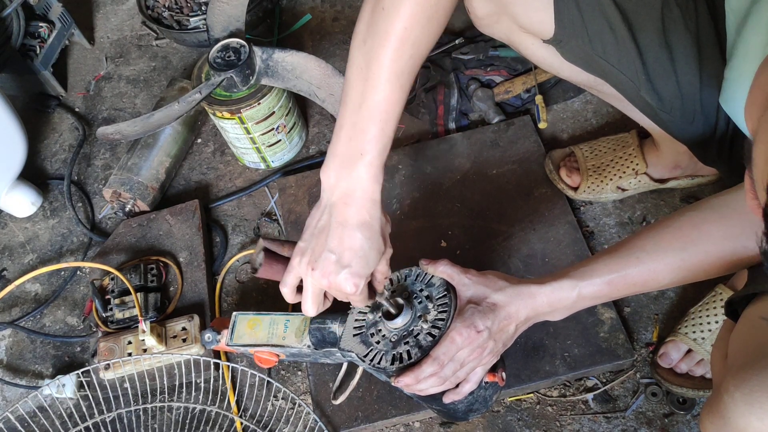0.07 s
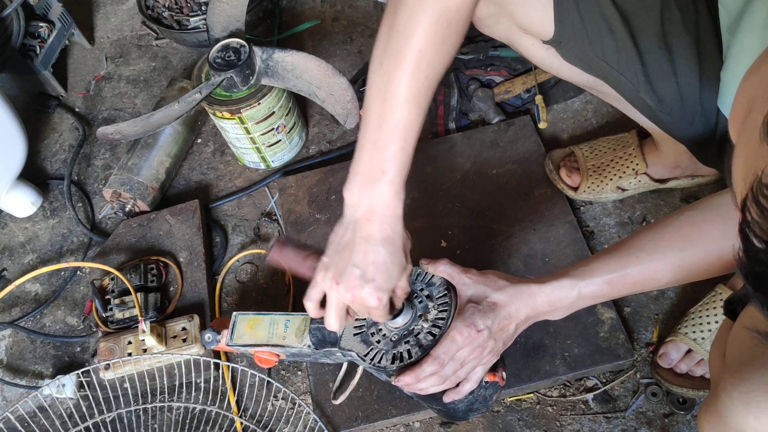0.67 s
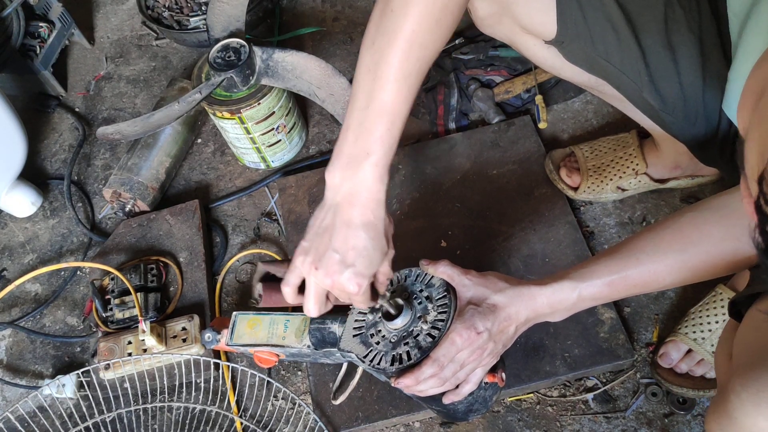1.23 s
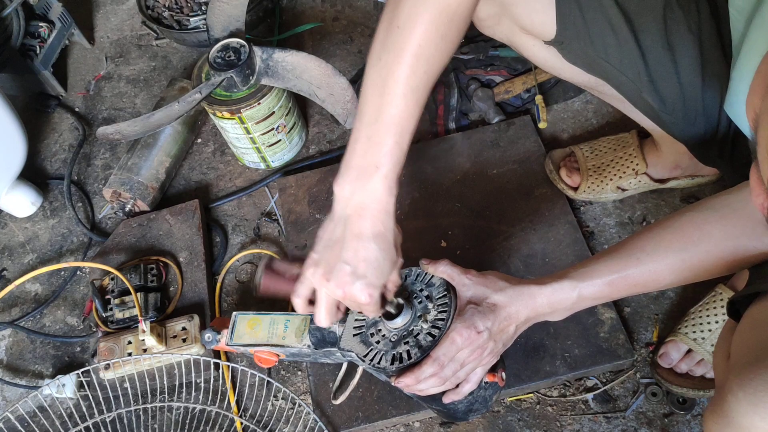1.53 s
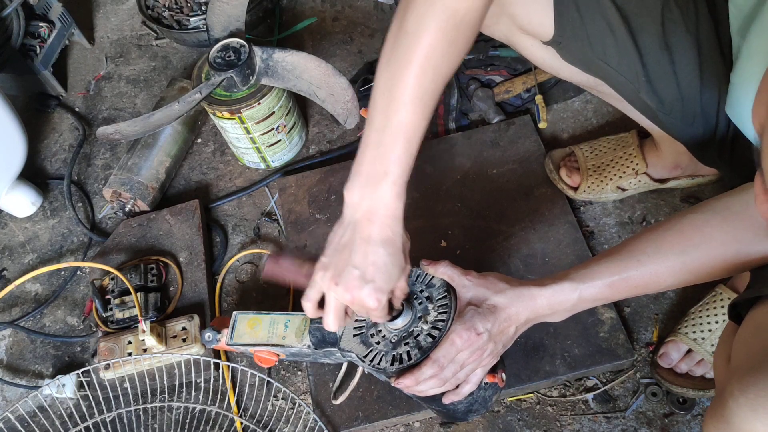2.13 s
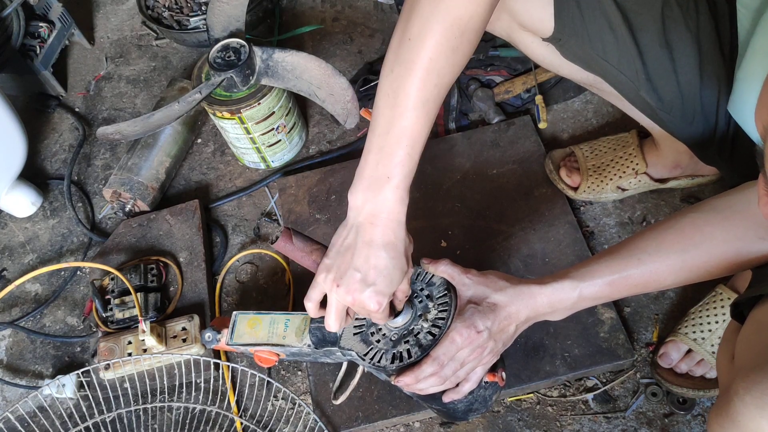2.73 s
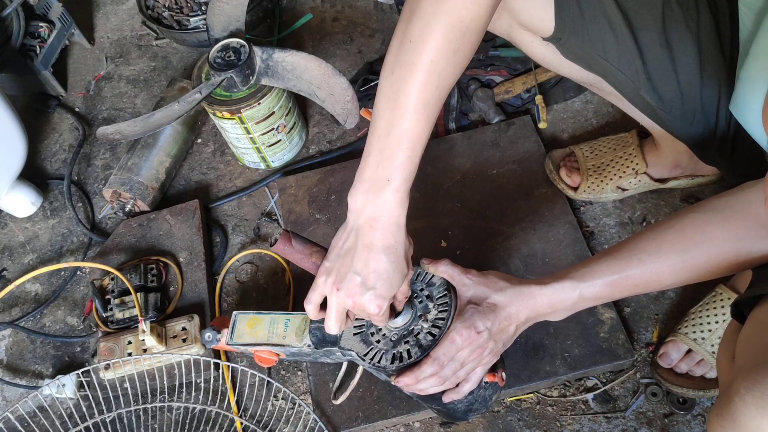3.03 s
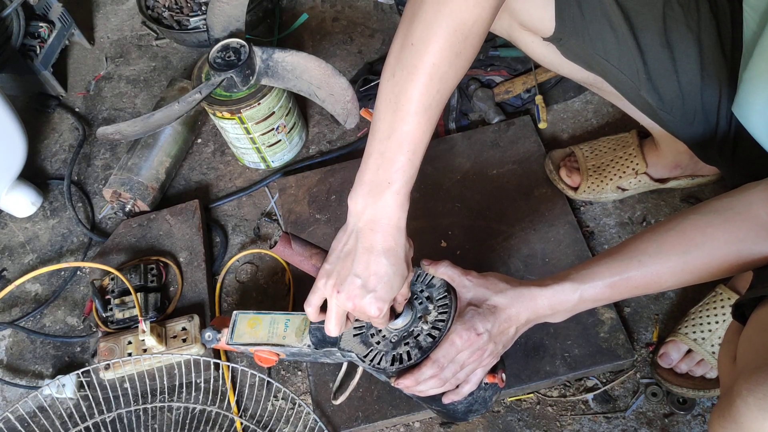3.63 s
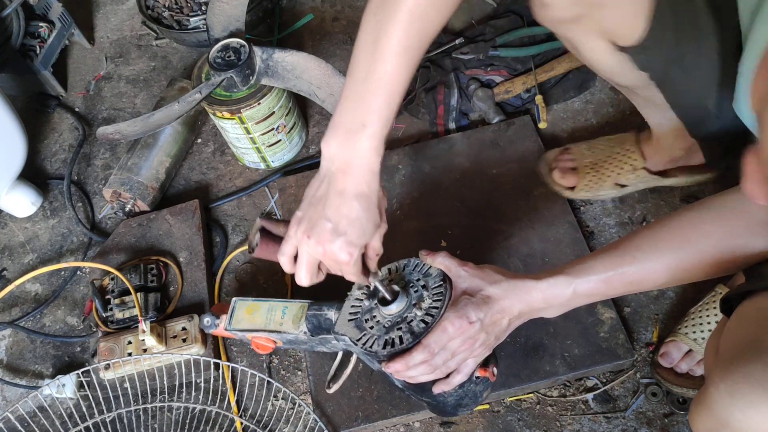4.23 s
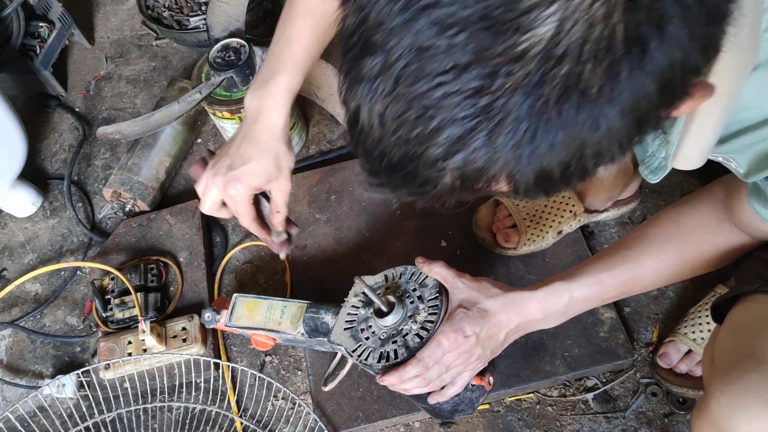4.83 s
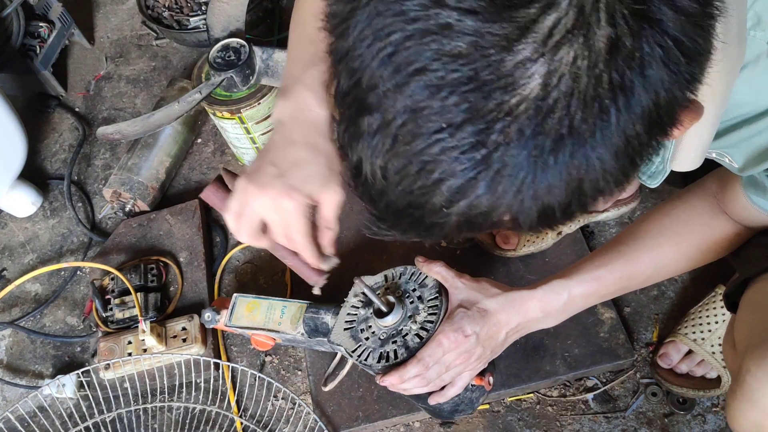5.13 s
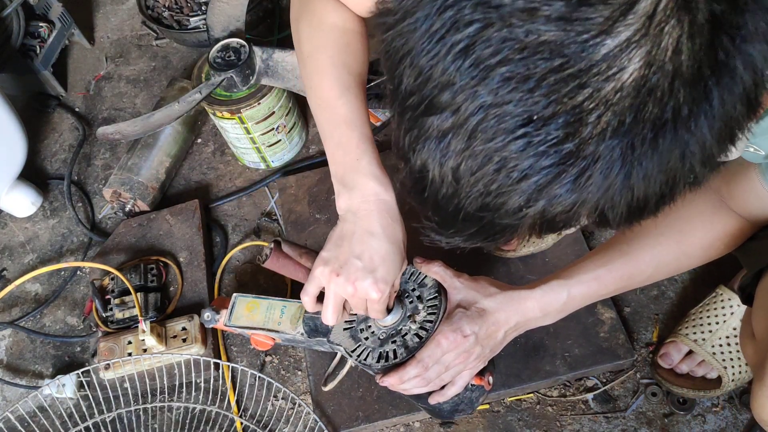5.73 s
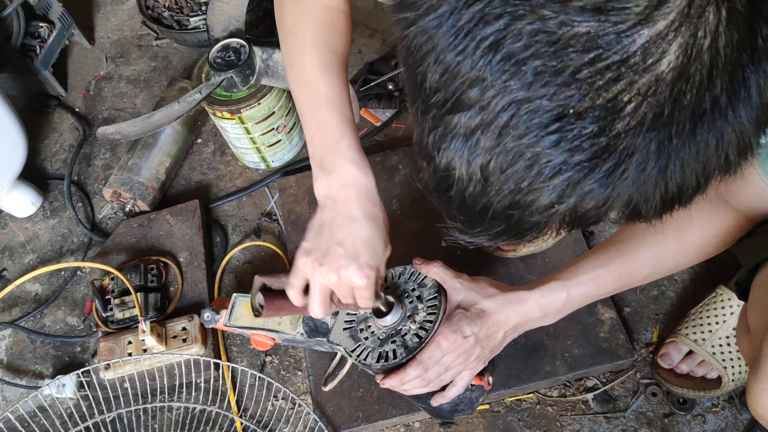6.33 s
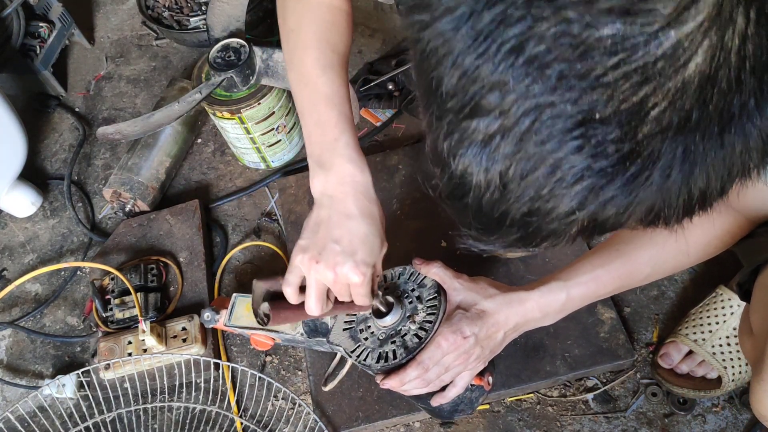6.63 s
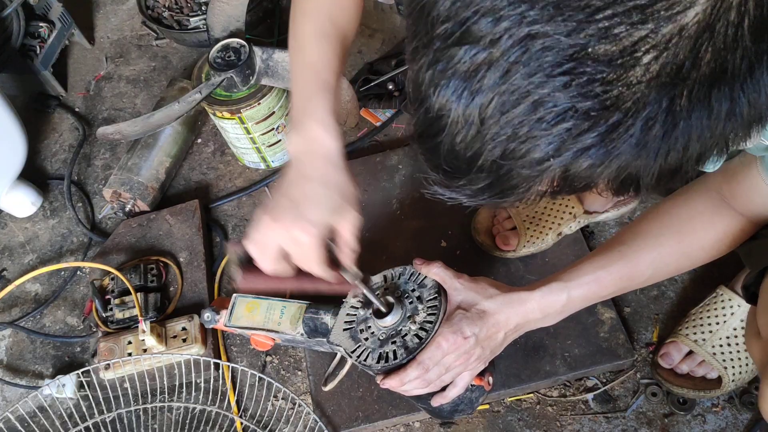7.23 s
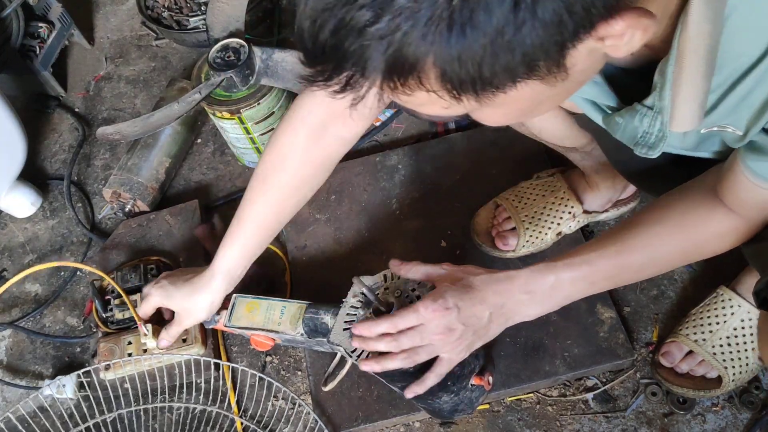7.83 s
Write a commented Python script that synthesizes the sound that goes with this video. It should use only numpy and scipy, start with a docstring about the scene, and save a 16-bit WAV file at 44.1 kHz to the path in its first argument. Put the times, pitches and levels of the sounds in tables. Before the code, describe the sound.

Close up in a repair workshop, dry, bright scratching pulses as sandpaper rubs around a steel motor shaft, the motor body ringing faintly. After a short pause with scuffs and paper snaps, a second, shorter bout starts with a thin, high squeal. The stiff paper crackles as it comes off and is set down. A fan's airy hum runs underneath, with occasional low puffs of air on the microphones.

```python
"""A gritty, hissing scratch pulses as sandpaper is twisted back and forth round a motor's steel shaft.
Stick-slip friction makes dense tiny clicks that set the gripped paper and the motor body ringing. There
are two bouts, the second with a thin squeal; the paper crackles as it is pulled off and put down, and a
faint high whine enters after the first bout. Behind the work a fan hums in the workshop, and its draught
buffets a close pair of microphones with ringing ports."""
import sys
import numpy as np
from scipy import signal
from scipy.fft import rfft, irfft, next_fast_len
from scipy.io import wavfile
from scipy.ndimage import uniform_filter1d

SR = 44100
rng = np.random.default_rng(int(sys.argv[2]) if len(sys.argv) > 2 else 0)


def wrap_up_sound(samples):
    """Save the sound to the file named by the first command line argument, as 16-bit audio."""
    columns = np.atleast_2d(samples).T
    # keep every value between -1 and 1, then stretch to whole-number steps
    tamed = np.clip(columns, -1, 1)
    steps = np.round(tamed * 32767).astype(np.int16)
    wavfile.write(sys.argv[1], SR, steps)


N = 347949
TIME = np.arange(N) / SR

# Levels in the tables are relative: each source applies its own gain.
# spectrum of the fan's rushing air: frequency_hz, gain_db
FAN_AIR_SPECTRUM = [(30, 7.5), (100, 6), (160, -6.5), (350, 0.5), (700, -1), (2000, -12.5), (3500, -11),
                    (4600, -10.5), (6000, -13), (7300, -15.5), (9000, -12.5), (11000, -26), (16000, -24)]
# tones of the fan: pitch_hz, level_db
FAN_TONES = [(103, -59.5), (210, -64.5), (371, -65)]
# spectrum of eddies at the microphones: frequency_hz, gain_db
EDDY_SPECTRUM = [(30, 1.5), (70, -1), (120, -11), (180, -18), (300, -33.5), (800, -67)]
# puffs of draught: centre_s, level_db, half_length_s
DRAUGHT_PUFFS = [(0.152, -57, 0.064), (0.861, -49.5, 0.016), (1.285, -51.5, 0.03), (2.294, -45.5, 0.032),
                 (3.637, -43.5, 0.04), (3.83, -47, 0.03), (6.408, -44, 0.031), (6.955, -43.5, .012),
                 (7.021, -38, 0.0093), (7.104, -44, 0.025), (7.44, -47.5, 0.019), (7.521, -40, 0.013)]
# breeze between the puffs: time_s, level_db
BREEZE_LEVEL = [(1.4, -45), (1.6, -65), (2.15, -72.5), (2.6, -43), (4.9, -51.5), (7.5, -42.5)]
# course of the high whine: time_s, pitch_hz
WHINE_PITCH = [(4.6, 14200), (5.3, 14400), (7.4, 15100), (7.89, 14700)]
# scuffs, knocks and a faint ring of hand and paper: start_s, level_db, pitch_hz, width_hz, decay_s
SOFT_CONTACTS = [(4.188, -42.5, 480, 230, 0.19), (4.393, -35.5, 557, 710, 0.053),
                 (4.477, -33, 590, 150, 0.0053), (4.48, -51.5, 888, 6.2, 0.12),
                 (5.402, -38, 630, 220, 0.07), (7.245, -33, 5060, 590, 0.064),
                 (7.276, -29, 1640, 1300, 0.019), (7.535, -40, 1620, 800, 0.027)]
# paper snapping on the shaft's end, in the hand and on the floor: start_s, level_db, decay_s
PAPER_SNAPS = [(3.901, -22, .003), (4.796, -28, .001), (4.801, -24, 0.00093), (4.805, -19.5, 0.00088),
               (4.812, -32, 0.0009), (5.29, -38.5, 0.02), (5.367, -34, .02), (5.415, -19, 0.0017),
               (5.462, -21, 0.022), (7.262, -29, 0.0072), (7.272, -16, 0.0056), (7.303, -22, 0.003),
               (7.563, -32.5, 0.064), (7.58, -28, 0.008)]
# squeal as the paper bears on the shaft again: time_s, pitch_hz, level_db
SQUEAL_COURSE = [(5.42, 9500, -70), (5.52, 9500, -33), (5.8, 9500, -44), (5.98, 8640, -43),
                 (6.15, 8300, -51), (6.3, 8400, -34), (6.5, 8400, -64.5)]
# spells with the paper on the shaft: start_s, end_s
CONTACT_BOUTS = [(0, 4.54), (5.36, 7.33)]
# resonances of the motor body: pitch_hz, width_hz, gain_db
MOTOR_MODES = [(570, 120, -43), (668, 83, 8.5), (853, 250, -0.5), (1097, 260, 3.5), (1330, 170, -8),
               (2013, 440, 2.5), (2610, 290, 1)]
# spectrum of grit scratching steel: frequency_hz, gain_db
GRIT_SPECTRUM = [(100, -14), (300, -18.5), (550, -10.5), (1200, -6), (2000, -2), (3000, 0.5), (5000, -1),
                 (16000, -6.5)]
# centre of the paper's hiss, shifting with the hold: time_s, pitch_hz
HISS_CENTRE = [(0.0, 9220), (0.98, 9060), (3.39, 9130), (4.55, 8820), (5.61, 9000), (6.06, 8900),
               (7.3, 8820)]
# strokes, each a loose slide back and then a gripped twist:
# twist_start_s, slide_length_s, twist_length_s, grip_lead_s, slide_swell_db, twist_swell_db, rasp_db
HAND_STROKES = [(0.2, 0.31, 0.214, 0.14, 2, 2, 5.5), (0.665, 0.18, 0.13, 0.088, 1.35, 2.5, 3.5),
                (1.035, 0.193, 0.15, 0.088, 3, 3, 4.5), (1.373, 0.2, 0.18, 0.085, 3, 2.5, 5.5),
                (1.73, 0.2, 0.18, 0.094, 4, 2.5, 5), (2.096, 0.221, 0.18, 0.094, 3, 2.5, 7),
                (2.481, 0.236, 0.24, 0.11, 3, 1.5, 3.5), (4.13, 0.2, 0.13, 0.023, 0.0, -1, 7),
                (6.375, 0.18, 0.16, 0.08, 3, 2.5, 5.4), (6.713, 0.17, 0.141, 0.061, 2.4, 2.5, 6),
                (7.037, 0.153, 0.13, 0.021, 1.6, 2.5, 8.5), (7.27, 0.11, 0.055, 0.01, 2.5, -1.5, 4)]
# pressure on the shaft in three phases, as the level of the sanding: time_s, level_db
PRESSURE_EASING = [(2.75, -25.5), (3.118, -26), (3.492, -29.5), (3.86, -29), (3.896, -24.5), (4.166, -25),
                   (4.334, -48), (4.38, -31), (4.46, -34.5), (4.54, -55)]
PRESSURE_BEARING_ON = [(5.36, -48), (5.368, -37.5), (5.466, -25.5), (5.708, -26), (5.994, -25),
                       (6.064, -27.5), (6.2, -27)]
PRESSURE_PULLING_OFF = [(7.17, -25.5), (7.25, -24.5), (7.264, -18), (7.302, -21), (7.33, -35)]
# response of the microphone ports: frequency_hz, left_db, right_db
PORT_RESPONSE = [(460, -2.5, -3), (1670, 2, 0.5), (3060, 1, 0.5), (5000, 4, 3), (5970, 5.5, 4),
                 (6790, 6, 12.5), (7570, 12.5, 15.5), (8180, 15.5, 9), (8780, 18, 3), (8640, 12.5, 0.5),
                 (10540, 13, 1.5), (12800, 8.5, -5.5), (16100, 4.5, -1)]


def from_db(db):
    """Amplitude ratio: tenfold for every 20 dB."""
    return 10 ** (np.asarray(db) / 20)


def unit_rms(x):
    """Normalisation to unit mean power."""
    return x / np.sqrt(np.mean(np.abs(x) ** 2) + 1e-20)


def in_time(rows):
    """Linear interpolation of a curve's columns at every sample."""
    times, *columns = np.transpose(rows)
    return [np.interp(TIME, times, column) for column in columns]


def ramp(start_s, length_s):
    """Linear rise from 0 to 1."""
    return np.clip((TIME - start_s) / max(length_s, 1e-3), 0, 1)


def bell(centre_s, half_length_s):
    """Gaussian pulse of height 1."""
    return np.exp(-.5 * ((TIME - centre_s) / half_length_s) ** 2)


def drift(rate_hz):
    """Low-passed noise: a smooth random fluctuation of unit rms."""
    pole = np.exp(-2 * np.pi * rate_hz / SR)
    return unit_rms(signal.lfilter([1], [1, -2 * pole, pole * pole], rng.standard_normal(N + SR))[SR:])


def rolloff(order, corner_hz, kind="low"):
    """Sections of a maximally flat filter."""
    return signal.butter(order, corner_hz, kind, fs=SR, output="sos")


def colour(x, spectrum):
    """Minimum-phase filtering through points of frequency_hz, gain_db."""
    hz, db = np.transpose(spectrum)
    size = 2 * next_fast_len(N // 2 + SR // 8)
    grid_hz = np.maximum(np.arange(size // 2 + 1) * SR / size, 1)
    gain = from_db(np.interp(np.log(grid_hz), np.log(hz), db))
    cepstrum = irfft(np.log(gain))
    cepstrum[1:size // 2] *= 2   # folding the cepstrum makes the filter causal
    cepstrum[size // 2 + 1:] = 0
    return irfft(rfft(x, size) * np.exp(rfft(cepstrum)))[..., :N]


def resonate(x, hz, width_hz):
    """Damped resonator with unit gain at its peak."""
    pole = np.exp(-np.pi * width_hz / SR)
    feedback = [1, -2 * pole * np.cos(2 * np.pi * hz / SR), pole * pole]
    return signal.lfilter(np.array([1, 0, -1]) * (1 - pole * pole) / 2, feedback, x)


def gliding_resonance(x, hz, width_hz):
    """Heterodyne filtering: a steep-sided resonance whose centre follows the curve hz."""
    carrier = np.exp(2j * np.pi * np.cumsum(hz) / SR)
    pole = np.exp(-np.pi * width_hz / SR)
    return (carrier * signal.lfilter([1], [1, -2 * pole, pole * pole], x / carrier)).real


def workshop(x, direct_db=-1.5, room_db=-8.0, t60_s=0.38, delay_s=0.012):
    """Reverberation: dense echoes, different on each side, decay exponentially after the direct sound."""
    age = TIME[:SR * 3 // 4]
    echoes = rng.standard_normal((2, len(age))) * from_db(-60 * age / t60_s) * (age > delay_s)
    echoes /= np.sqrt(np.sum(echoes ** 2, axis=1, keepdims=True))
    tail = signal.fftconvolve(x, echoes, axes=1)[:, :N]
    return from_db(direct_db) * x + from_db(room_db) * tail


def fan(air_db=-37.5, hum_db=-2.0, coherent_below_hz=900):
    """Broadband flow noise, coherent at both microphones in the bass, plus wavering motor tones."""
    low = signal.sosfilt(rolloff(1, coherent_below_hz), rng.standard_normal(N))
    high = signal.sosfilt(rolloff(1, coherent_below_hz, "high"), rng.standard_normal((2, N)))
    hum = sum(from_db(db) * np.sqrt(2) * np.sin(2 * np.pi * hz * TIME + 0.39 * drift(2.7))
              for hz, db in FAN_TONES)
    return from_db(air_db) * colour(low + high, FAN_AIR_SPECTRUM) + from_db(hum_db) * hum


def draught(puff_db=16.0, breeze_db=1.0, lumpy_db=-3.0, lean_right_db=.5):
    """Turbulence rumbles separately at each microphone, as a deep breeze and fuller puffs."""
    level_db, = in_time(BREEZE_LEVEL)
    puffs = sum(from_db(db) * bell(centre_s, half_s) for centre_s, db, half_s in DRAUGHT_PUFFS)
    turbulence = rng.standard_normal((2, N)) * from_db(lumpy_db * np.array([drift(22), drift(22)]))
    eddies = unit_rms(colour(turbulence, EDDY_SPECTRUM))
    breeze = unit_rms(signal.sosfilt(rolloff(1, 65), eddies))
    rumble = from_db(puff_db) * puffs * eddies + from_db(level_db + breeze_db) * breeze
    return rumble * from_db([[-lean_right_db], [lean_right_db]])


def whine(whine_db=-71.0, flicker_db=3, jitter_hz=50, fade_s=.1):
    """Random amplitude and frequency modulation make a thin tone flicker and waver."""
    hz, = in_time(WHINE_PITCH)
    envelope = from_db(whine_db + flicker_db * drift(12)) * ramp(WHINE_PITCH[0][0] - fade_s, fade_s)
    return envelope * np.sin(2 * np.pi * np.cumsum(hz + jitter_hz * drift(60)) / SR)


def knocks(knock_db=0.5):
    """Noise-driven resonance: each soft contact swells and dies away in one band."""
    contacts = np.zeros(N)
    for start_s, db, hz, width_hz, decay_s in SOFT_CONTACTS:
        age = np.clip((TIME - start_s) / decay_s, 0, 30)
        envelope = np.exp(-age) - np.exp(-6 * age)
        contacts += from_db(db) * envelope * unit_rms(resonate(rng.standard_normal(N), hz, width_hz))
    return from_db(knock_db) * contacts


def grains(per_s, spread_db):
    """Shot noise of unit rms: one click of random size for each grit tip that catches."""
    sizes = from_db(spread_db * np.minimum(rng.exponential(1, N), 4)) * rng.choice([-1, 1], N)
    return unit_rms(sizes * (rng.random(N) < per_s / SR))


def scatter(clicks, direct_share, spread_s):
    """Multipath: each click starts at another spot and reaches each microphone by its own paths."""
    decay = np.exp(-1 / (spread_s * SR))
    power = signal.lfilter([1 - decay], [1, -decay], clicks ** 2 + 1e-18)
    diffuse = np.sqrt((1 - direct_share) * power) * rng.standard_normal((2, N))
    return np.sqrt(direct_share) * clicks + diffuse


def snaps(snap_db=-5.5):
    """Impulsive excitation: each snap of the stiff paper is a bright, decaying shower of grit clicks."""
    envelope = sum(from_db(db) * (TIME >= start_s) * np.exp(-np.clip((TIME - start_s) / decay_s, 0, 30))
                   for start_s, db, decay_s in PAPER_SNAPS)
    shower = scatter(envelope * grains(per_s=15000, spread_db=2.0), direct_share=0.19, spread_s=0.001)
    bright = colour(shower, [(200, -6), (1000, 0), (3000, -5), (8500, -0.5), (12000, -1.5)])
    return from_db(snap_db) * bright


def squeal(squeal_db=-4.0):
    """Stick-slip friction gives a narrow band of noise that falls in pitch."""
    hz, level_db = in_time(SQUEAL_COURSE)
    sounding = (TIME > SQUEAL_COURSE[0][0]) * (TIME < SQUEAL_COURSE[-1][0])
    band = unit_rms(gliding_resonance(rng.standard_normal((2, N)), hz, width_hz=340))
    return from_db(squeal_db + level_db) * sounding * band


def stroke_speed(start_s, length_s, peak_share):
    """Skewed half sine: the hand starts from rest, reaches speed 1 and stops again."""
    return np.sin(np.pi * np.interp(TIME, start_s + length_s * np.array([0, peak_share, 1]), [0, .5, 1]))


def hand_motion(slide_bite=0.7, twist_bite=1.3, turn_dip_db=-1.5, turn_bite_db=-1.8, turn_s=0.032):
    """Friction noise gains level (swell) and top treble (bite) with speed, and dips at the turns."""
    swell_db, bite_db = np.zeros((2, N))
    for start_s, slide_s, twist_s, _, slide_db, twist_db, _ in HAND_STROKES:
        slide = slide_db * stroke_speed(start_s - slide_s, slide_s, peak_share=0.47)
        twist = twist_db * stroke_speed(start_s, twist_s, peak_share=0.76)
        turn_in, turn_out = bell(start_s, turn_s), bell(start_s + twist_s, turn_s)
        swell_db += slide + twist + turn_dip_db * turn_out
        bite_db += slide_bite * slide + twist_bite * twist + turn_bite_db * (turn_in + turn_out)
    return swell_db, bite_db


def hand_grip(close_s=.074, open_s=0.04, loose_db=-4.5, sag_db=1.8, slack_hz=-130, taut_hz=86):
    """Tension raises pitch: gripping strengthens the rasp, which bends upward as the paper tightens."""
    grip_db, bend_hz = np.zeros((2, N))
    for start_s, slide_s, twist_s, lead_s, _, _, rasp_db in HAND_STROKES:
        closed = ramp(start_s - lead_s, close_s)
        wound = ramp(start_s, twist_s)
        loose = ramp(start_s - slide_s, open_s) * (1 - closed)
        tight = closed * (1 - ramp(start_s + twist_s - open_s / 2, open_s))
        grip_db += loose_db * loose + tight * (rasp_db - sag_db * (wound - .5))
        bend_hz += tight * (slack_hz * (1 - wound) + taut_hz * wound)
    return grip_db, bend_hz


def hand_echo(x, gain=0.56, path_s=.0028, sway_s=0.000511):
    """Comb filtering: sound off the moving hand interferes with the direct sound at each microphone."""
    echoes = [np.interp(TIME - (path_s + sway_s * drift(1.42)), TIME, side) for side in x]
    return x + gain * np.array(echoes)


def motor_ring(shake):
    """Modal superposition: the catches drive the resonances of the motor body."""
    return unit_rms(sum(from_db(db) * resonate(shake, hz, width_hz) for hz, width_hz, db in MOTOR_MODES))


def paper_rasp(shake, bend_hz, pitch_hz=1620, flare_db=1.8):
    """Forced vibration: the gripped paper rings in one hollow, gliding resonance."""
    ring = gliding_resonance(shake, pitch_hz + bend_hz, width_hz=360)
    return unit_rms(ring * from_db(flare_db * drift(15)))


def grit_scratch(catches, clumps, hiss_db=-9.5):
    """Filtered shot noise: broadband clicks of grit on steel, with the paper's narrower hiss on top."""
    hiss_hz, = in_time(HISS_CENTRE)
    flutter = scatter(clumps * grains(per_s=5000, spread_db=4.0), direct_share=0.27, spread_s=0.00082)
    hiss = unit_rms(gliding_resonance(flutter, hiss_hz, width_hz=1980))
    grit = colour(scatter(catches, direct_share=0.35, spread_s=0.00084), GRIT_SPECTRUM)
    return hand_echo(grit + from_db(hiss_db) * hiss)


def stroke_tone(scratch, swell_db, bite_db, dull_db, grip_db,
                rest_grind_db=-1.1, rest_bite_db=2.0, firm_grip_db=4.5):
    """Spectral tilt: a fast stroke turns dull grinding to sharp hiss; a light touch does the reverse."""
    grind = signal.sosfiltfilt(rolloff(2, 5000), scratch)
    sharp = signal.sosfiltfilt(rolloff(3, 10400, "high"), scratch)
    tilted = (scratch + grind * (from_db(rest_grind_db + dull_db - swell_db) - 1)
              + sharp * (from_db(rest_bite_db + bite_db - dull_db) - 1))
    low = signal.sosfiltfilt(rolloff(2, 1700), tilted)
    low_db = 0.57 * np.clip(grip_db - firm_grip_db, -12, 4)   # the low end needs a firm grip
    return tilted + low * (from_db(low_db) - 1)


def stick_slip(chatter_db=-0.56, waver_db=0.8):
    """Amplitude modulation: the paper sticks and slips, so catches come in millisecond clumps."""
    in_bout = sum(1. * (TIME >= start_s) * (TIME < end_s) for start_s, end_s in CONTACT_BOUTS)
    touching = uniform_filter1d(in_bout, size=400)
    return touching * unit_rms(from_db(chatter_db * drift(220) + waver_db * drift(13)))


def sandpaper(scratch_db=-4.5, rasp_db=-21, motor_db=-22, firm_db=-29, throb_hz=13.8, throb_db=1.5):
    """Frictional excitation: grit scratches the steel, and the same catches drive paper and motor."""
    pressure_db, = in_time(np.vstack([PRESSURE_EASING, PRESSURE_BEARING_ON, PRESSURE_PULLING_OFF]))
    dull_db = 0.46 * np.maximum(firm_db - pressure_db, 0)   # grows as the touch lightens
    swell_db, bite_db = hand_motion()
    grip_db, bend_hz = hand_grip()
    clumps = stick_slip()
    catches = clumps * grains(per_s=14000, spread_db=2.5)
    scratch = stroke_tone(grit_scratch(catches, clumps), swell_db, bite_db, dull_db, grip_db)
    shake = scatter(catches, direct_share=0.74, spread_s=0.0014)
    ringing = from_db(rasp_db) * paper_rasp(shake, bend_hz) + from_db(motor_db) * motor_ring(shake)
    throb = np.sin(2 * np.pi * throb_hz * TIME + drift(0.75))
    body = from_db(grip_db + dull_db + throb_db * throb) * ringing
    return from_db(pressure_db) * (from_db(scratch_db + swell_db) * scratch + body)


def scene():
    """Superposition: hand work in the room, over the fan, the whine and the draught."""
    return workshop(sandpaper() + squeal() + snaps() + knocks()) + fan() + whine() + draught()


def record(dry, cutoff_hz=15800):
    """Port resonance: each microphone rings at its own treble pitch; a steep low-pass cuts the top."""
    ports = np.array(PORT_RESPONSE)
    heard = np.array([colour(dry[0], ports[:, [0, 1]]), colour(dry[1], ports[:, [0, 2]])])
    return signal.sosfilt(signal.ellip(12, .1, 80, cutoff_hz, fs=SR, output="sos"), heard)


dry = scene()
out = record(dry)
wrap_up_sound(out)
```